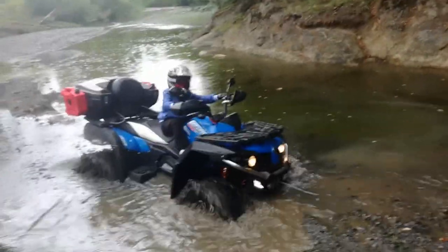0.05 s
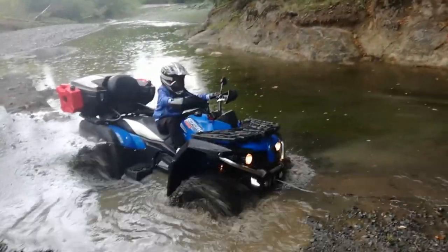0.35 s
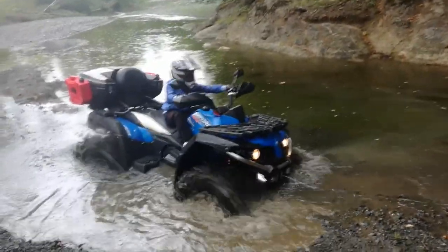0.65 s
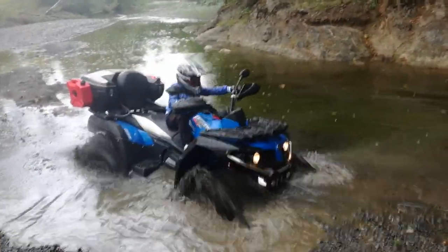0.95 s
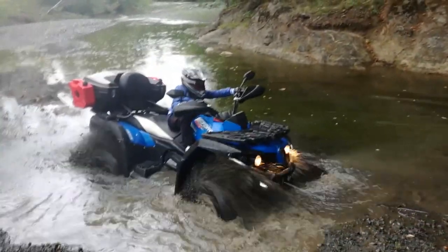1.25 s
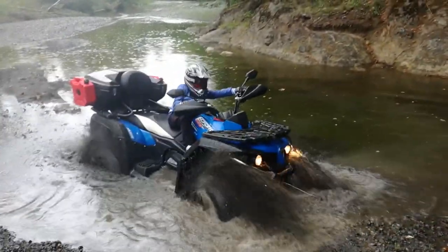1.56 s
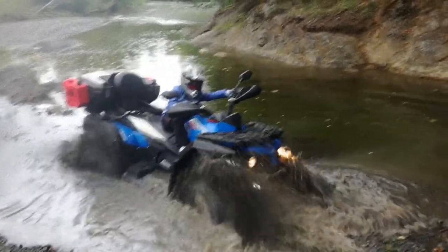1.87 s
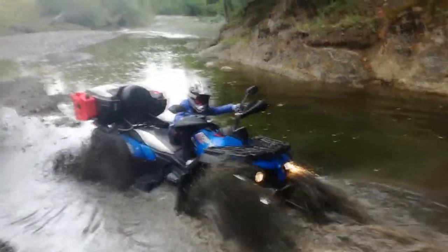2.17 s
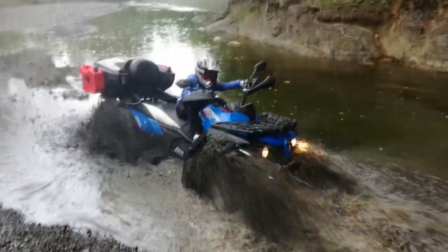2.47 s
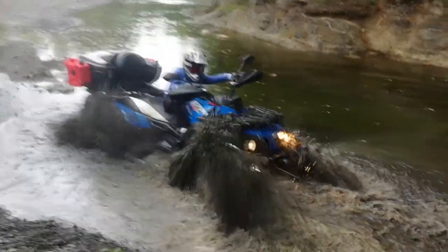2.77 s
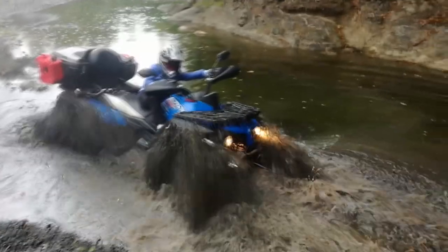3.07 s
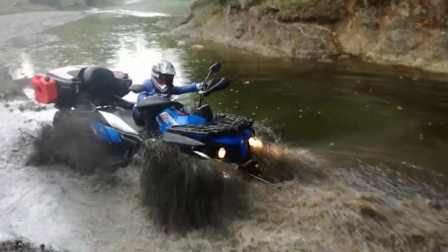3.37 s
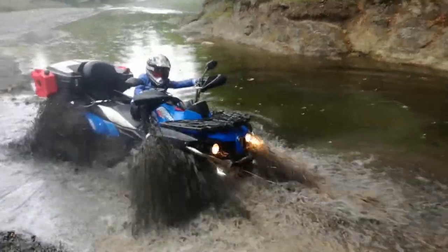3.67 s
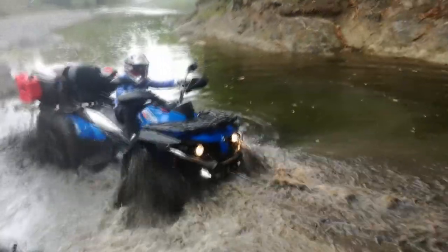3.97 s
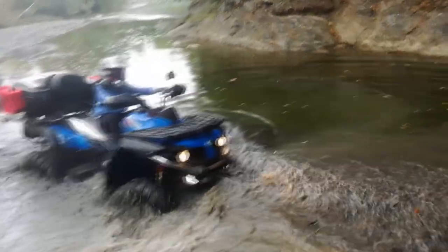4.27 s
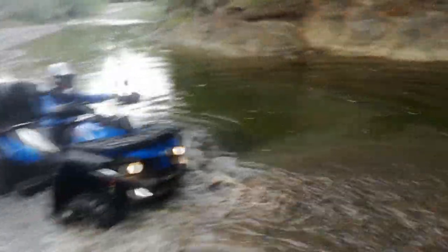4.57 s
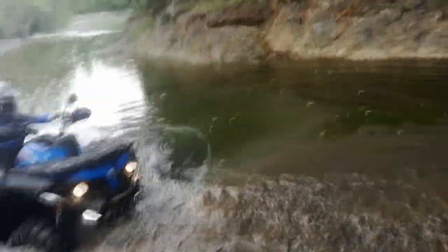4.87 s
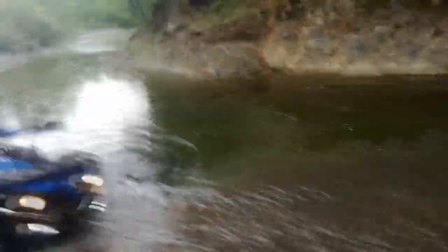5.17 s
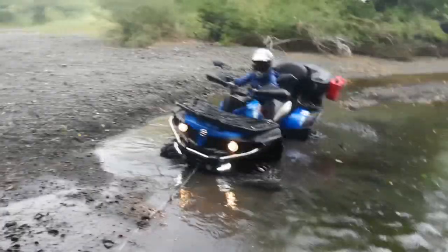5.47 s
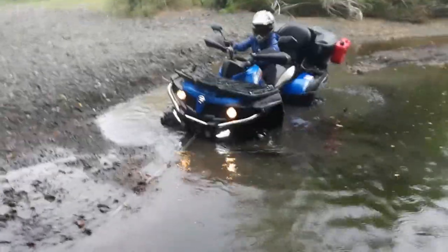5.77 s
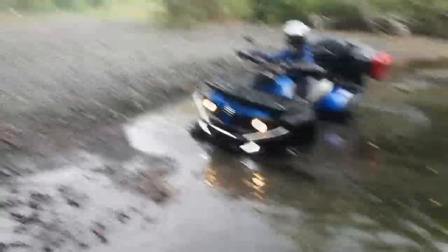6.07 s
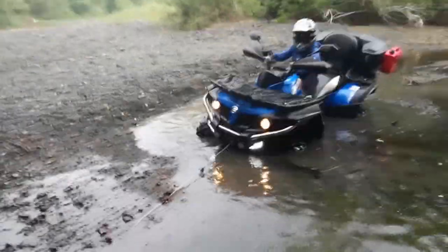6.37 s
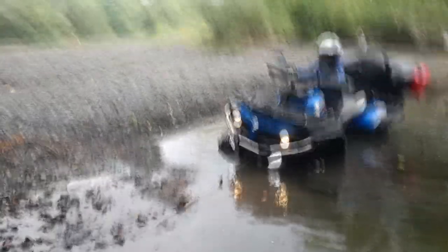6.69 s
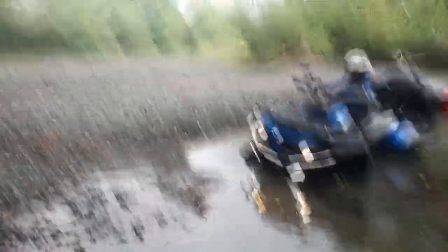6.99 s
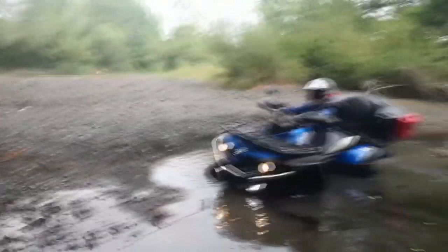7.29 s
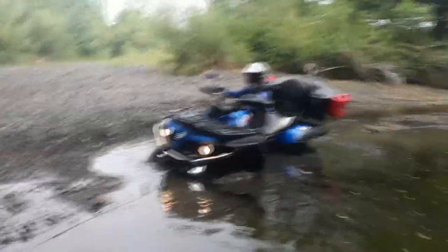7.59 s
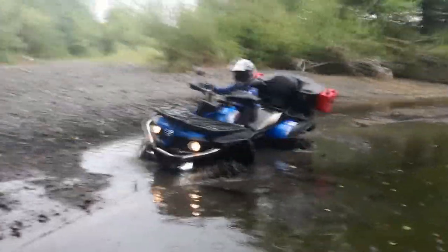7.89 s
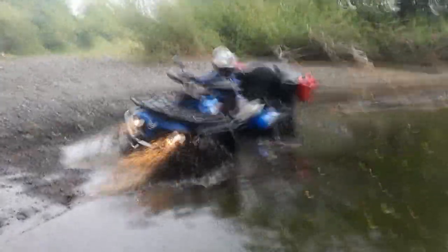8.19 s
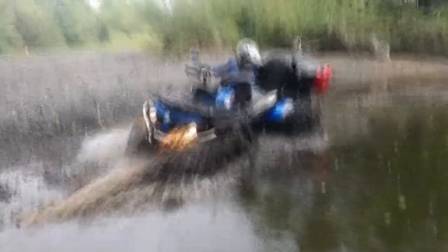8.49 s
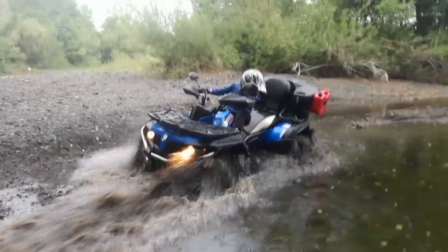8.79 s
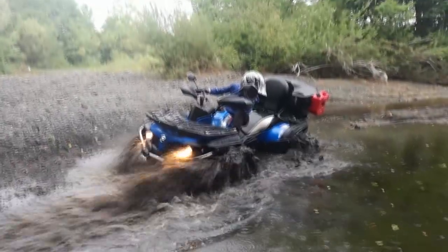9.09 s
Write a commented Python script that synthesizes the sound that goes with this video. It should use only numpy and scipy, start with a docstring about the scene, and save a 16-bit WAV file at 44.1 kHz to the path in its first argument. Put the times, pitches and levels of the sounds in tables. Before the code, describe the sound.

A single-cylinder quad bike drones under load a few metres away in a shallow river. Its revs rise around 1 second and hold while the wheels churn and splash. A sharp tick comes at 3 seconds. At about 3.4 seconds the throttle shuts and the engine falls away, reaching a slow, thumping idle by 4.8 as the splashing fades into scattered ticks and small plops over a faint current. From 5.5 seconds, with the bike now heard from the front, an electric winch whirrs over the idle and clicks off at 6.8. Just after 7 seconds the drive train clanks several times and the engine revs up, peaking near 8 seconds as churning and spray return. The revs waver, with another clank at 8.4 and three thin, high belt squeals between 8.2 and 9. A tick and a brief throttle dip come at about 9 seconds.

```python
"""A single-cylinder quad bike labours through a shallow river, its wheels churning water and throwing spray.
The throttle shuts and the engine sinks to a thumping idle. Then, heard from the front, a winch whirrs
and clicks off, the engine revs up, the drive train clanks and the wet belt sings. Crank speed and
throttle drive the engine: firings ring the tailpipe, airbox and casing, and merge into a drone under load."""
import sys
import numpy as np
from scipy.fft import rfft, irfft, next_fast_len
from scipy.io import wavfile
from scipy.ndimage import map_coordinates

SR = 44100
rng = np.random.default_rng(int(sys.argv[2]) if len(sys.argv) > 2 else 0)


def file_out(sig):
    """Save sig as 16-bit WAV at sys.argv[1]."""
    # one column per channel
    cols = np.atleast_2d(sig).T
    # limit, then scale
    lim = np.clip(cols, -1, 1)
    pcm = np.round(lim * 32767).astype(np.int16)
    wavfile.write(sys.argv[1], SR, pcm)


N = 403074
PIPE_DELAY_S = 0.0036  # a firing's travel down the pipe

# engine, throttle shut: firing_hz, thump_db, clatter_db, front_clatter_gain_db, rattle_db
ENGINE_BY_SPEED = [(12.1, -37.5, -56.5, 7, -67), (15.3, -36.5, -51.5, 6.5, -55),
                   (23.4, -32, -38.5, 0.5, -49.5), (38.2, -30.5, -38, 1.5, -40), (47.2, -32, -34, -2, -40),
                   (55, -44, -35, 3, -53)]
# engine under throttle: throttle (0-1), bark_db, overtones_over_clatter_db
ENGINE_BY_THROTTLE = [(0, -55.5, -17), (.12, -42.5, -11.5), (.5, -25, -10.5), (1, -17.5, -6.5)]


def exhaust(cycle, firing_hz, throttle, front):
    """Slow firings thump the tailpipe and bark in the airbox; under load they merge into a drone."""
    # spectrum of one thump: freq_hz, gain_db
    tailpipe = [(15, -70), (30, -33.5), (55, 2.5), (82, 3), (106, 8.5), (120, 6.5), (138, -21), (200, -4),
                (255, -5.5), (305, -29), (350, -19), (430, -52.5), (800, -59), (2000, -100)]
    # thump boost from the front: firing_hz, gain_db
    front_thump = [(15, 7), (32, 3.5)]
    pipe = causal(tailpipe)
    thump_db, *_ = lookup(ENGINE_BY_SPEED, firing_hz)
    boost_db, = lookup(front_thump, firing_hz)
    pulses = firings(cycle, firing_hz, jitter_cycles=.003, rough_db=.9)
    thump = -amp(thump_db + front * boost_db) * resonate(pulses, firing_hz, pipe)
    # the intake gulps once more between firings, less evenly
    gulps = firings(cycle + .43, firing_hz, jitter_cycles=.025, rough_db=2.5)
    gulps *= .75 * np.interp(firing_hz, [13, 20], [.25, 1])
    airbox = lambda f: resonance(f, hz=200.5, width_hz=28) * resonance(f, hz=248, width_hz=130)
    bark_db, _ = lookup(ENGINE_BY_THROTTLE, throttle)
    overrun_db = -29 + 25.5 * np.log2(firing_hz / 47)  # bark that stays with the throttle shut
    bark = np.hypot(amp(bark_db), amp(overrun_db)) * resonate(pulses + gulps, firing_hz, airbox)
    merged = np.interp(firing_hz, [33, 37.5], [0, 1]) * np.minimum(throttle / .28, 1)
    return (1 - merged) * (thump + bark) + merged * drone(cycle, firing_hz, throttle, front, pipe)


def drone(cycle, firing_hz, throttle, front, pipe):
    """Engine orders through the silencer; on a light throttle the overtones drop, the odd ones most."""
    # order level at full throttle: freq_hz, level_db
    silencer = [(45, -38.5), (76, -35), (95, -22.5), (120, -25.5), (145, -20), (190, -24), (235, -25),
                (280, -32.5), (325, -43), (400, -67)]
    # added from the front: freq_hz, gain_db
    front_colour = [(47, -5.5), (95, -6), (125, 5), (143, 1), (165, 6), (190, 3), (215, 7), (240, 4.5),
                    (285, -1.5), (330, 11)]
    shut_odd_db, shut_even_db = -24.5, -10
    out = np.zeros(N)
    for order in range(1, 8):
        hz = order * firing_hz
        db = along(silencer, hz) + front * along(front_colour, hz)
        if order > 1:
            db += (1 - throttle) * (shut_odd_db if order % 2 else shut_even_db)
        if order == 2:
            db -= 2.5 * np.maximum(firing_hz - 48.3, 0)  # fades at top speed
        db += wobble(35) + .5 * wobble(5)  # combustion varies by cycle and drifts
        out += amp(db) * np.cos(2 * np.pi * order * cycle + np.angle(pipe(hz)))
    return -np.sqrt(2) * out


def mechanics(cycle, firing_hz, throttle, front):
    """Hard overtones and gas puffs of the firings; clatter and rattle swell with each engine cycle."""
    # exhaust and casing modes: pitch_hz, width_hz, gain_db
    hard_modes = [(348, 100, 8.5), (425, 34, 7.5), (519, 53, 3.5), (707, 49, 3.5), (935, 370, -3.5),
                  (1272, 63, 6.5), (1650, 200, -1), (1930, 46, -12)]
    # casing clatter: freq_hz, gain_db
    casing = [(350, -12), (600, -7.5), (692, -6), (879, -4), (1040, -3), (1260, -1), (1380, 1), (1650, 0.5),
              (1880, -3), (2040, -1), (2710, -8.5), (2960, -8), (4660, -13.5), (5000, -13.5), (6500, -21),
              (11000, -120)]
    # loose guards and covers: pitch_hz, width_hz, gain_db
    cover_modes = [(1194, 49, -1.5), (1313, 29, 4.5), (1666, 300, -7), (1920, 37, -7)]
    puff_db, puff_decay_s = -11.5, 0.021  # level relative to the clatter
    _, shut_db, front_db, rattle_db = lookup(ENGINE_BY_SPEED, firing_hz)
    _, overtone_db = lookup(ENGINE_BY_THROTTLE, throttle)
    clatter_db = shut_db + front * front_db + 3.5 * throttle
    snarl_db = 0.9 * np.maximum(firing_hz - 49.8, 0)
    pulses = firings(cycle, firing_hz, jitter_cycles=.0004, rough_db=.9)
    modes = lambda f: sum((-1) ** k * amp(db) * resonance(f, hz, width_hz) ** 2
                          for k, (hz, width_hz, db) in enumerate(hard_modes))
    overtones = amp(overtone_db + snarl_db) * resonate(pulses, firing_hz, modes)
    depth_db = np.interp(firing_hz, [15, 45], [3.6, 1.1])  # slow strokes stand further apart
    stroke_db = depth_db * np.cos(2 * np.pi * (cycle - .08)) + 0.41 * np.cos(4 * np.pi * cycle)
    swell = amp(stroke_db + 0.89 * wobble(60))
    clatter = spread(noise() * swell, casing)
    covers = lambda f: sum(amp(db) * resonance(f, hz, width_hz) ** 2 for hz, width_hz, db in cover_modes)
    rattle = unit(filtered(rng.standard_normal(N) * swell, covers))
    since_firing_s = ((cycle - PIPE_DELAY_S * firing_hz) % 1) / firing_hz
    gas = rng.standard_normal(N) * np.exp(-since_firing_s / puff_decay_s)
    puffs = unit(filtered(gas, lambda f: resonance(f, hz=758, width_hz=520) ** 2))
    return amp(clatter_db) * (overtones + clatter + amp(puff_db) * puffs) + amp(rattle_db) * rattle


def firings(cycle, firing_hz, jitter_cycles, rough_db):
    """One pulse per engine cycle, scattered in time and strength."""
    due = np.searchsorted(cycle, np.arange(1, int(cycle[-1]) + 1))
    timing, strength = rng.standard_normal((len(due), 2)).T
    at = np.clip(due + jitter_cycles * SR * timing / firing_hz[due], 0, N - 1).astype(int)
    return np.bincount(at, amp(rough_db * strength), N)


def resonate(pulses, firing_hz, response):
    """Pulses through a resonator; a unit pulse train gives rms 1 at any speed."""
    rates_hz = np.geomspace(8, 64, 200)
    orders_hz = rates_hz[:, None] * np.arange(1, 256)
    rms = rates_hz / SR * np.sqrt(2 * np.sum(np.abs(response(orders_hz)) ** 2, axis=1))
    return filtered(pulses, response) / np.interp(firing_hz, rates_hz, rms)


def water(throttle, front):
    """The tyres churn big bubbles, fling sheets of water and, once under way, shed a fine spray."""
    # water thrown by the wheels: time_s, splash_db
    wading = [(0, -47), (.6, -44), (1.1, -37.5), (2.95, -36), (3.15, -39), (3.6, -37.5), (4.05, -42.5),
              (4.6, -57.5), (5.3, -72), (7.13, -68), (7.27, -47.5), (7.75, -37.5), (8.2, -38.5), (8.7, -41),
              (9.14, -38.5)]
    # spectra of the three layers: freq_hz, gain_db
    churn_spectrum = [(30, -67), (150, 22), (350, 6), (550, -5.5), (850, -2.5), (1150, 1), (1800, 4.5),
                      (3000, -9.5), (7000, -13.5), (16000, -18.5)]
    splash_spectrum = [(1000, 1.5), (2200, 1), (3200, 1.5), (4200, -1.5), (5300, 2.5), (7500, -0.5),
                       (9500, -56), (13000, -35)]
    spray_spectrum = [(5000, -2.5), (8000, 4), (9500, 0), (12000, -4.5), (14800, 0), (16000, -1.5)]
    spray_rise_db_per_s = 26.5
    splash_db, = curves(wading)
    churn_db = splash_db - 1.5 + 5.5 * throttle + 6.5 * front
    rise_db = spray_rise_db_per_s * np.arange(N) / SR
    spray_db = -2 + rise_db + np.minimum.accumulate(splash_db - rise_db)  # splash level, rise limited
    churn = noise() + 0.4 * bubbles(count=3000, hz=831, octaves=1.063, cycles=5.1, scatter_db=1.5)
    splash = noise() + 0.39 * bubbles(count=9000, hz=4300, octaves=1.153, cycles=18, scatter_db=3.5)
    spray = noise() + 0.42 * bubbles(count=9000, hz=9660, octaves=0.81, cycles=4.2, scatter_db=3)
    surge = amp(0.68 * wobble(14))
    return surge * (amp(churn_db + 1.6 * wobble(25)) * spread(churn, churn_spectrum)
                    + amp(splash_db + wobble(30)) * spread(splash, splash_spectrum)
                    + amp(spray_db) * spread(spray, spray_spectrum))


def bubbles(count, hz, octaves, cycles, scatter_db):
    """Bubbles and drops in stereo: short rising damped sines, a few much louder than the rest."""
    tuning, strength, onset, pan = rng.random((count, 4)).T[:, :, None]
    pitch_hz = np.clip(hz * 2 ** (octaves * (2 * tuning - 1)), 200, 15000)
    age = pitch_hz * np.arange(int(SR * 4 * cycles / hz)) / SR / cycles
    size = amp(scatter_db * np.minimum(-np.log(1 - strength), 5))
    ring = size * np.exp(-2 * age) * np.sin(2 * np.pi * cycles * age * (1 + age / 20))
    at = (onset * N).astype(int) + np.arange(age.shape[1])
    gains = np.cos(2 * np.pi * pan), np.sin(2 * np.pi * pan)
    return unit(np.array([np.bincount(at.ravel(), (ring * g).ravel(), N)[:N] for g in gains]))


def belt():
    """The wet drive belt slips: thin, rough whistles that glide, swell and fade."""
    # whistles: start_s, length_s, first_hz, last_hz, level_db
    squeals = [(8.235, 0.34, 5430, 5280, -40), (8.52, 0.19, 4640, 5100, -39.5),
               (8.83, 0.13, 5450, 4850, -35.5)]
    out, t = np.zeros((2, N)), np.arange(N) / SR
    flutter_hz = 90 * np.array([wobble(600), wobble(500)])
    for start_s, length_s, first_hz, last_hz, db in squeals:
        progress = np.clip((t - start_s) / length_s, 0, 1)
        phase = np.cumsum(first_hz + (last_hz - first_hz) * progress + flutter_hz, axis=1) / SR
        out += amp(db) * np.sin(np.pi * progress) * np.sin(2 * np.pi * phase)
    return out * amp(2.5 * wobble(53))


def winch():
    """An electric winch runs briefly: gear hiss, with tones that fade as the rope settles."""
    # gear hiss: freq_hz, gain_db
    gear_spectrum = [(290, -5), (500, -7.5), (1160, -4.5), (1250, -10), (1680, -10), (1920, 2.5),
                     (2190, -6.5), (2820, -0.5), (3260, -5), (4990, -1.5), (6510, -10.5), (7740, -10.5),
                     (8720, -22), (12000, -22.5), (15600, -44), (22000, -120)]
    # gear tones: pitch_hz, level_db
    gear_tones = [(1244, -55), (1960, -59), (2772, -49), (4840, -57), (5179, -59)]
    start_s, stop_s, attack_s, release_s, fade_db_per_s = 5.5, 6.79, 0.032, 0.049, 7
    t = np.arange(N) / SR
    running = np.clip((t - start_s) / attack_s, 0, 1) * np.clip(1 - (t - stop_s) / release_s, 0, 1)
    wavering_s = np.cumsum(1 + .002 * wobble(12) + .005 * wobble(220)) / SR
    tones = sum(amp(db) * np.sin(2 * np.pi * (hz * wavering_s + rng.random())) for hz, db in gear_tones)
    fade = amp(-fade_db_per_s * np.maximum(t - start_s, 0))
    hiss = amp(-45 + 2.4 * wobble(17)) * spread(noise(), gear_spectrum)
    return running * (fade * tones + hiss)


def impacts():
    """Bright ticks and duller clanks on the bike, round plops in its wake."""
    # stones, drops and the winch relay: start_s, peak_db, pitch_hz
    ticks = [(2.981, -16.5, 7800), (3.2285, -29, 7600), (4.2344, -25, 5540), (4.7056, -31.5, 5300),
             (4.845, -41, 5400), (4.9751, -44, 4020), (5.004, -40, 3860), (5.312, -38.5, 5160),
             (5.5179, -31, 4020), (5.74, -31, 4500), (5.899, -25.5, 4350), (6.3764, -34, 4740),
             (6.791, -21.5, 5030), (8.9604, -20.5, 4940), (9.0673, -35, 3520)]
    # drive train taking up load: start_s, peak_db, pitch_hz
    clanks = [(7.101, -27, 1960), (7.173, -27, 1350), (7.234, -24.5, 2000), (7.286, -30, 2050),
              (7.317, -30, 2000), (7.397, -19, 2070), (8.372, -16, 1490)]
    # air pockets closing: start_s, peak_db, pitch_hz
    plops = [(4.854, -36.5, 1520), (4.87, -41, 1420)]
    out, t = np.zeros((2, N + SR)), np.arange(SR // 10) / SR
    for start_s, db, hz in ticks:
        add(out, start_s, amp(db) * knock(hz, t60_s=0.053, width_ratio=0.23))
    for start_s, db, hz in clanks:
        add(out, start_s, amp(db) * knock(hz, t60_s=0.063, width_ratio=0.066))
    for start_s, db, hz in plops:
        ring = (1 - np.exp(-t / .003)) * amp(-60 * t / .028) * np.sin(2 * np.pi * hz * t)
        add(out, start_s, amp(db) * ring / ring.max())
    return out[:, :N]


def knock(hz, t60_s, width_ratio):
    """A burst of contact noise ringing about one pitch, peak 1."""
    t = np.arange(SR // 10) / SR
    burst = rng.standard_normal((2, len(t))) * amp(-60 * t / t60_s)
    mode = resonance(np.fft.rfftfreq(len(t), 1 / SR), hz, width_ratio * hz)
    ring = irfft(rfft(burst) * mode, len(t))
    return ring / np.abs(ring).max()


def river():
    """The quiet, steady rush of the current."""
    # running water: freq_hz, gain_db
    spectrum = [(20, -29), (45, 9), (100, -5.5), (250, 3.5), (470, -26), (1500, -22), (3200, -30),
                (15000, -34.5)]
    return amp(-45.5) * spread(noise(), spectrum)


def amp(db):
    """Decibels to gain."""
    return 10 ** (np.asarray(db) / 20)


def unit(x):
    """Scaled to rms 1."""
    return x / np.sqrt(np.mean(x ** 2) + 1e-20)


def along(points, hz):
    """(freq_hz, value) points read on a log axis."""
    freqs_hz, values = np.transpose(points)
    return np.interp(np.log(hz + 1), np.log(freqs_hz + 1), values)


def lookup(rows, control):
    """Each column after the first, read at the control value."""
    first, *columns = np.transpose(rows)
    return [np.interp(control, first, column) for column in columns]


def curves(rows):
    """One value per sample for each column after time_s."""
    return lookup(rows, np.arange(N) / SR)


def noise():
    """Two channels of white noise."""
    return rng.standard_normal((2, N))


def wobble(rate_hz):
    """A smooth curve through random knots."""
    knots = rng.standard_normal(int(N * rate_hz / SR) + 4)
    return map_coordinates(knots, [np.arange(N) * rate_hz / SR])


def filtered(x, response):
    """x through a complex frequency response."""
    size = next_fast_len(N + SR // 2)
    return irfft(rfft(x, size) * response(np.fft.rfftfreq(size, 1 / SR)), size)[..., :N]


def resonance(f, hz, width_hz):
    """Causal response of one mode."""
    return 1j * f * width_hz / (hz * hz - f * f + 1j * f * width_hz)


def causal(spectrum, size=16384):
    """Minimum-phase response with this spectrum: it rings only after it is struck."""
    hz = np.fft.rfftfreq(size, 1 / SR)
    cepstrum = irfft(np.log(amp(along(spectrum, hz))))
    log_gain = rfft(cepstrum * (1 + np.sign(np.fft.fftfreq(size))))
    return lambda f: np.exp(np.interp(f, hz, log_gain))


def spread(pair, spectrum):
    """Two unrelated signals become coloured stereo, mid at rms 1, near mono in the bass."""
    # left-right likeness: freq_hz, correlation
    likeness = [(200, 0.97), (500, 0.21), (1000, 0.74), (2000, 0.22), (4000, 0), (12000, 0)]
    angle = lambda f: np.arccos(np.clip(along(likeness, f), -1, 1)) / 2
    weights = lambda f: np.array([np.cos(angle(f)), np.sin(angle(f))])
    mid, side = filtered(pair, lambda f: amp(along(spectrum, f)) * weights(f))
    return np.array([mid + side, mid - side]) / np.std(mid)


def add(out, start_s, sound):
    """Mix a short sound in."""
    out[:, round(start_s * SR):][:, :sound.shape[-1]] += sound


def scene():
    """The quad bike a few metres away, over the river."""
    # crank speed: time_s, firing_hz
    crank_speed = [(0.0, 37.84), (0.663, 38.74), (1.023, 44.87), (1.515, 47.07), (3.228, 47.44),
                   (3.38, 50.59), (3.473, 41.16), (3.883, 25.7), (4.454, 15.12), (4.852, 12.32),
                   (5.461, 12.0), (5.561, 14.45), (6.131, 12.33), (7.119, 12.37), (7.336, 25.84),
                   (7.856, 53.81), (8.029, 55.21), (8.358, 45.03), (8.646, 48.32), (8.875, 47.24),
                   (9.0, 40.88), (9.14, 41.06)]
    # throttle opening, with a small blip as the engine settles to idle: time_s, throttle (0-1)
    opening = [(.62, 0.5), (.76, 0.88), (1.4, 0.96), (2.9, 0.97), (3.37, 0.87), (3.43, 0.04), (4.15, 0),
               (4.3, 0.02), (4.55, 0.11), (4.8, 0.05), (7.05, 0), (7.17, 0.24), (7.32, 0.57), (7.6, 0.97),
               (8.09, 1), (8.18, 0.52), (8.31, 0.43), (8.46, 0.86), (8.88, 0.96), (8.93, 0.27), (9, 0),
               (9.08, 0.55)]
    front_s = 5.51  # from here on the bike faces the listener
    firing_hz, = curves(crank_speed)
    throttle = np.clip(curves(opening)[0], 0, 1)
    front = np.clip((np.arange(N) / SR - front_s) / .01, 0, 1)
    cycle = np.cumsum(firing_hz) / SR
    engine = exhaust(cycle - PIPE_DELAY_S * firing_hz, firing_hz, throttle, front)
    engine = engine + mechanics(cycle, firing_hz, throttle, front)
    background = river()
    return engine + water(throttle, front) + belt() + winch() + impacts() + background


def record(dry):
    """The two channels share the bass and colour the rest differently, up to a band limit."""
    # balance: freq_hz, left_over_right_db
    balance = [(700, -1.5), (1250, 2), (2300, 2.5), (4400, -6.5), (8000, -2), (14000, 1.5)]
    top_hz = 15900
    lean_db = lambda f: along(balance, f) * np.clip(f / 300 - 1, 0, 1)
    return filtered(dry, lambda f: amp(lean_db(f) * np.array([[.5], [-.5]])) * (f < top_hz))


dry = scene()
out = record(dry)
file_out(out)
```